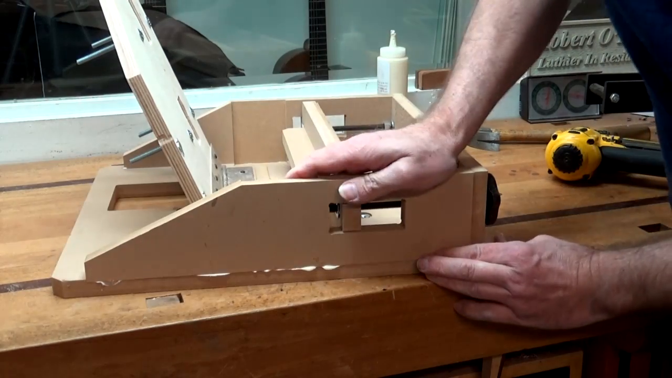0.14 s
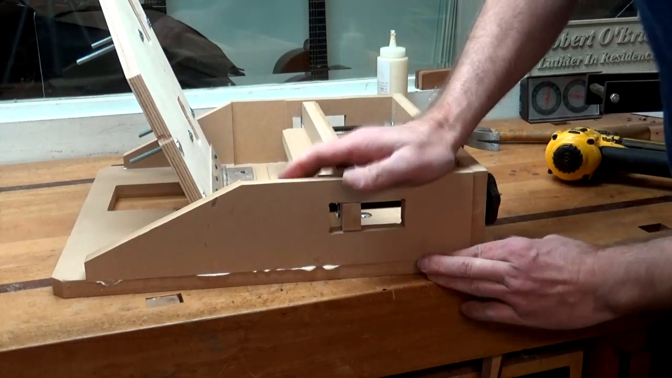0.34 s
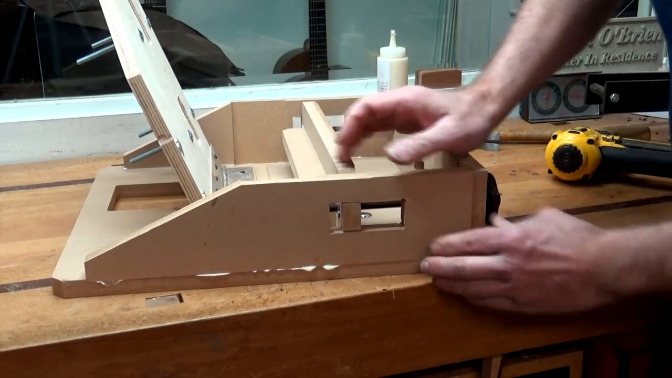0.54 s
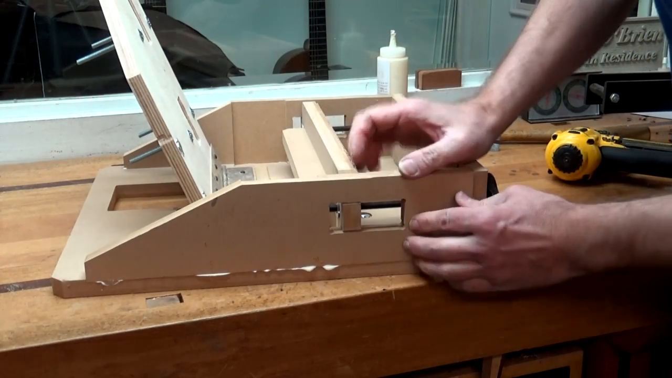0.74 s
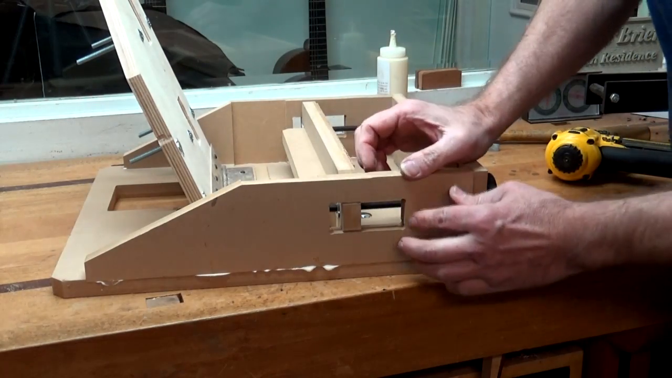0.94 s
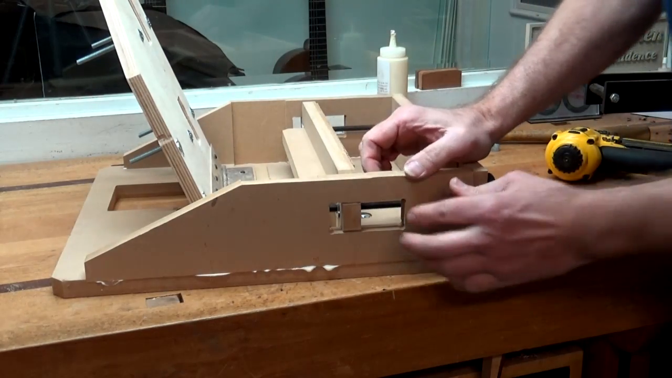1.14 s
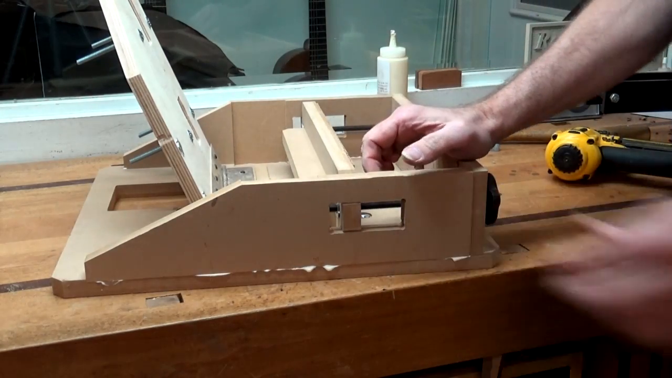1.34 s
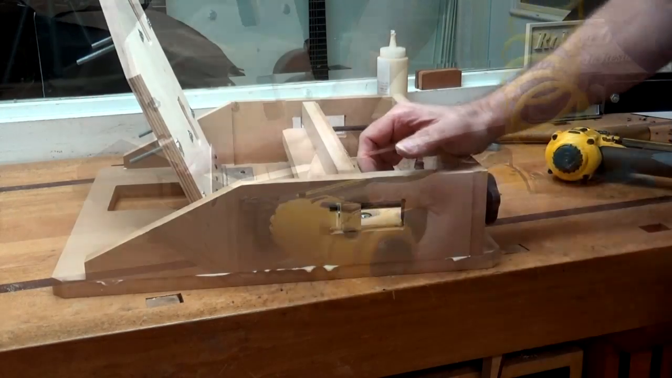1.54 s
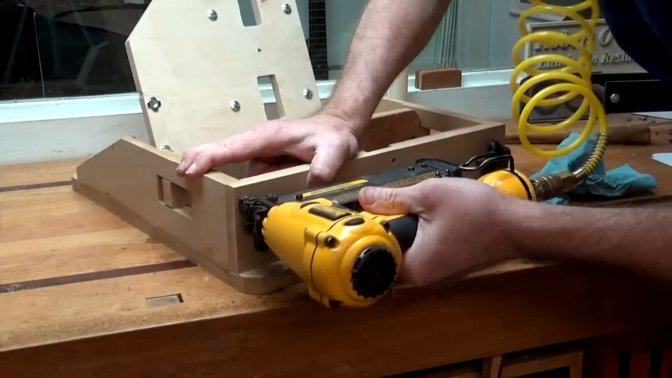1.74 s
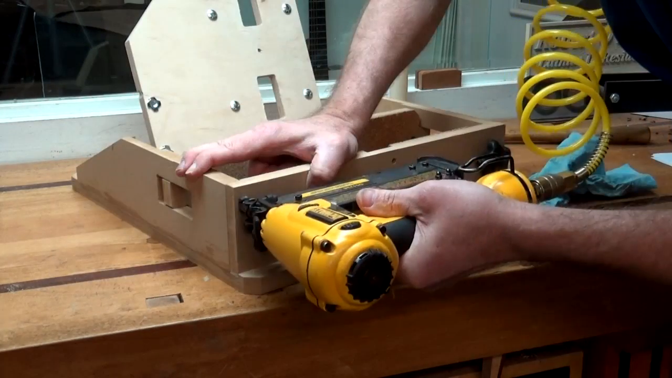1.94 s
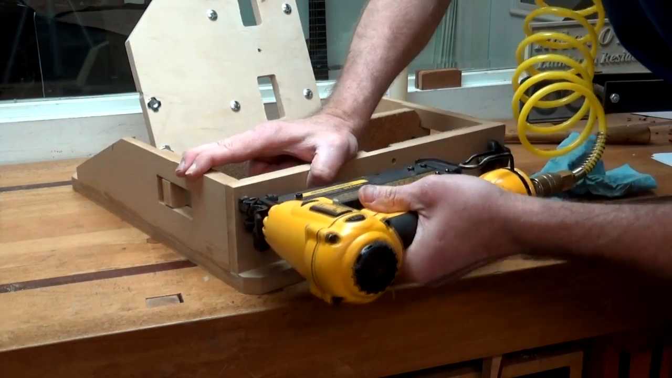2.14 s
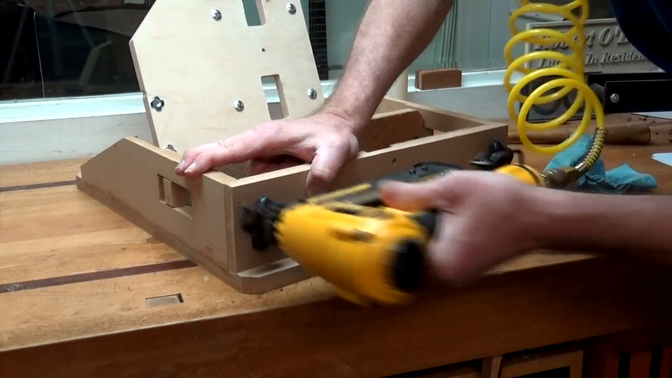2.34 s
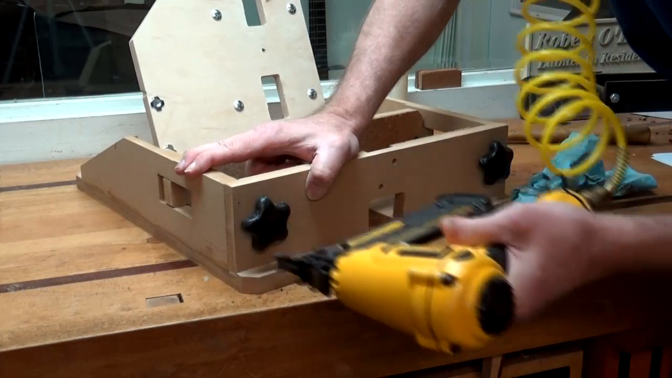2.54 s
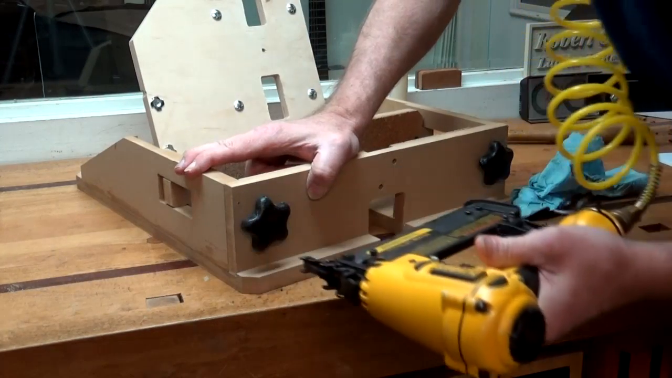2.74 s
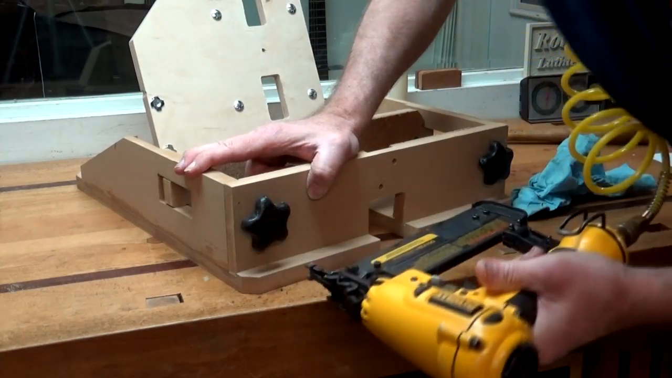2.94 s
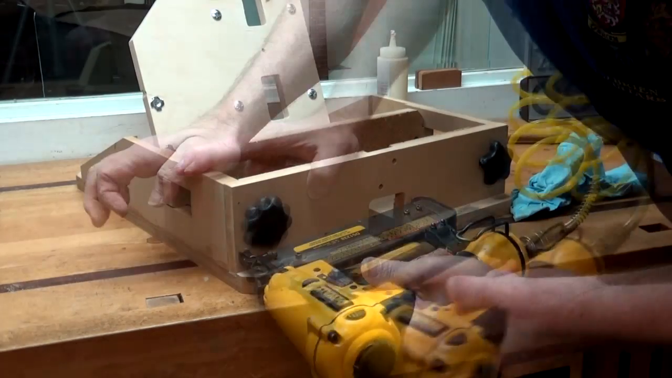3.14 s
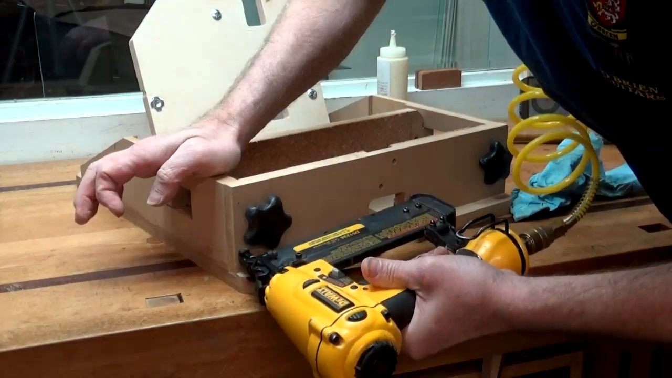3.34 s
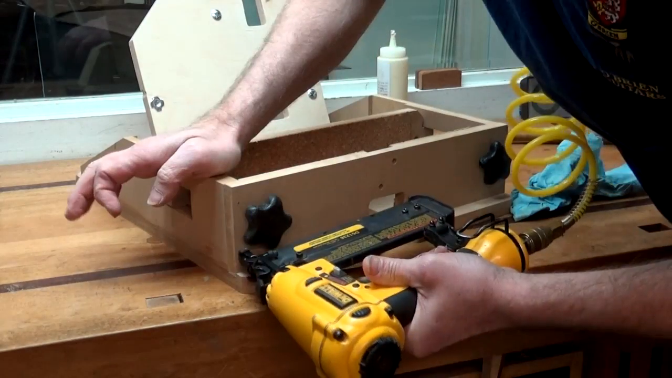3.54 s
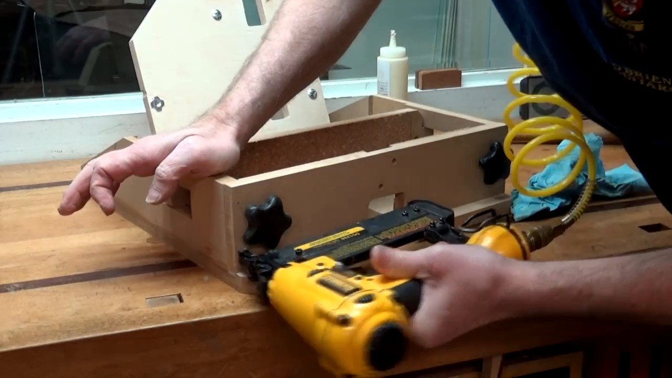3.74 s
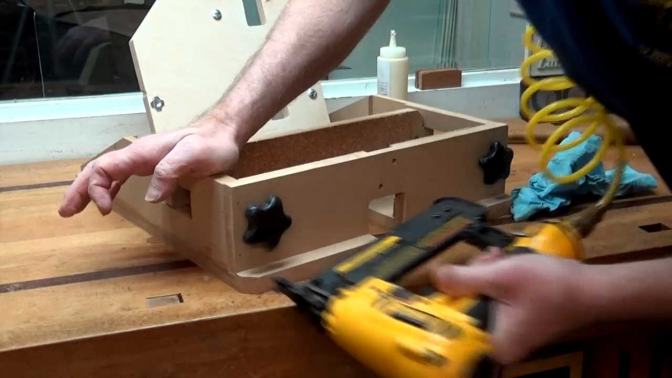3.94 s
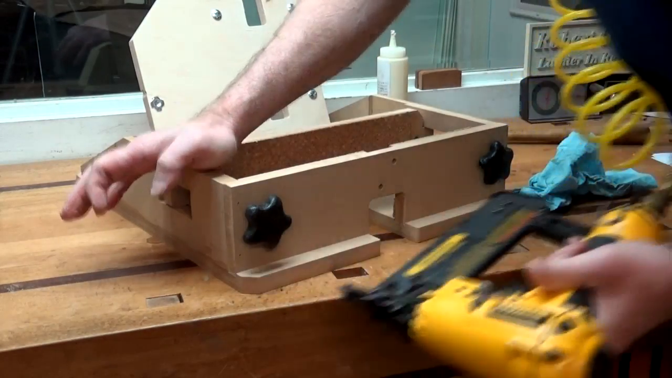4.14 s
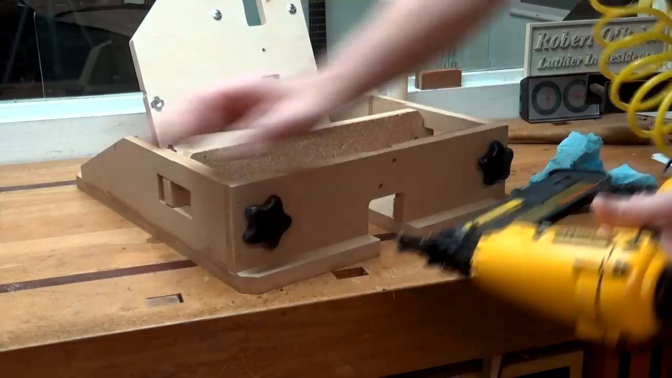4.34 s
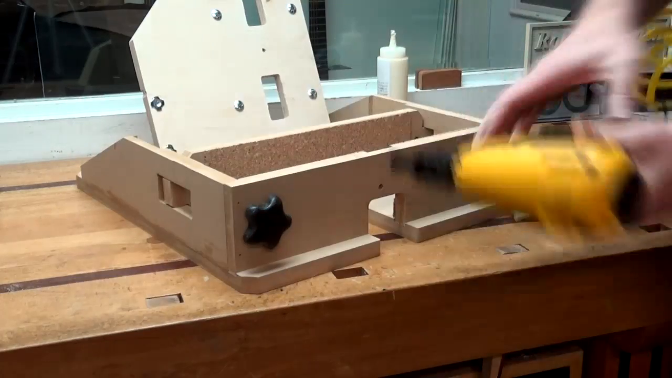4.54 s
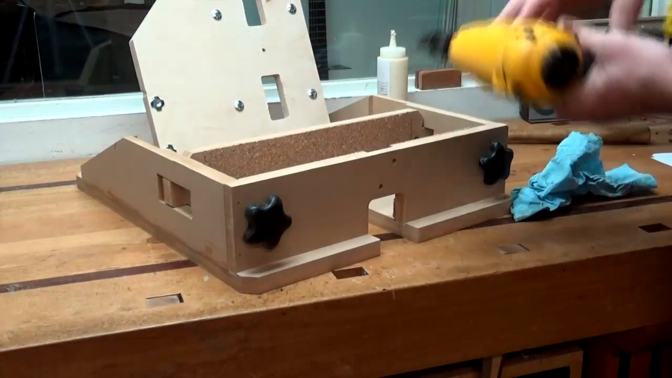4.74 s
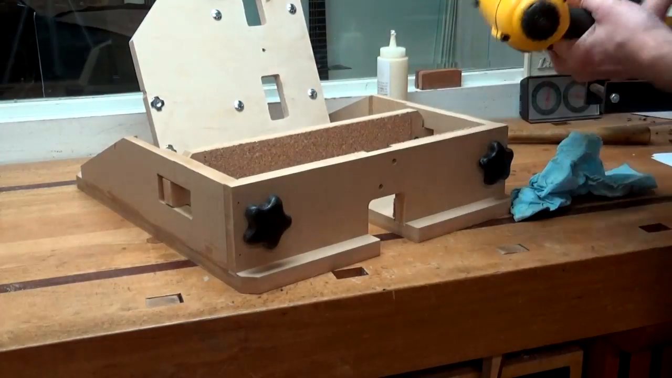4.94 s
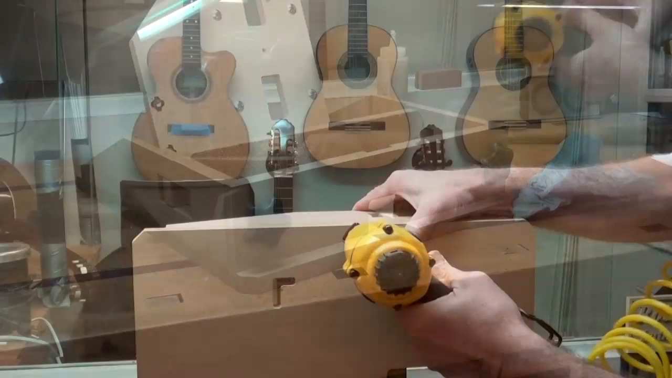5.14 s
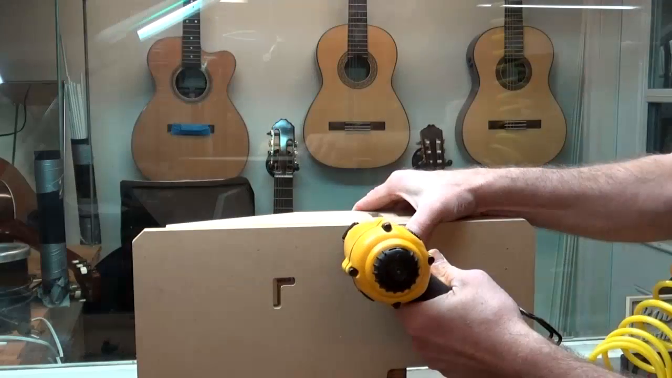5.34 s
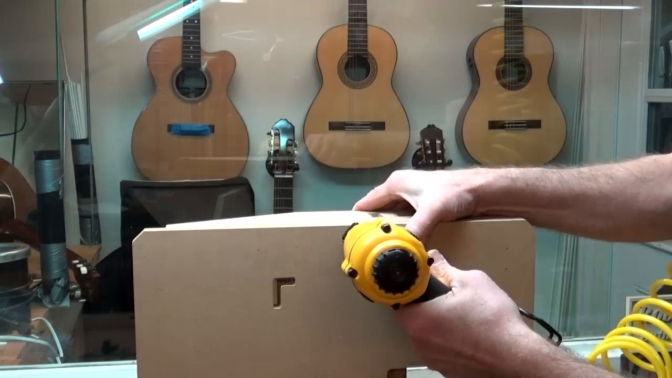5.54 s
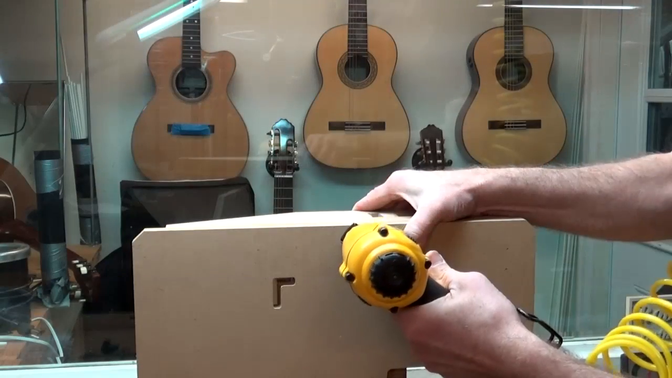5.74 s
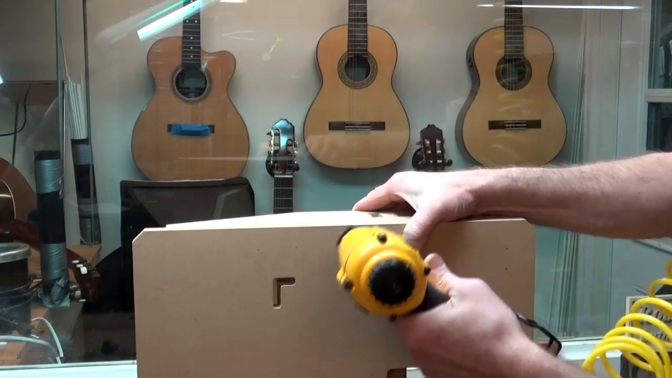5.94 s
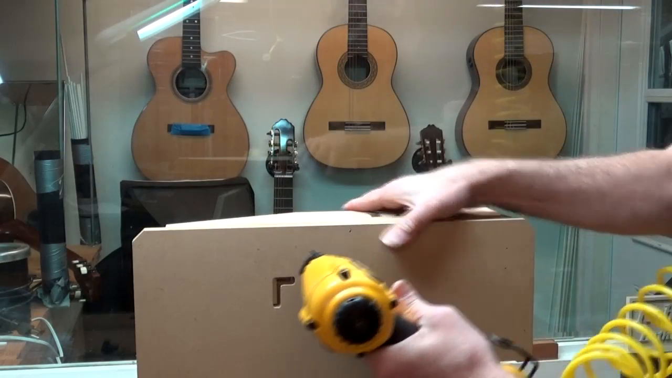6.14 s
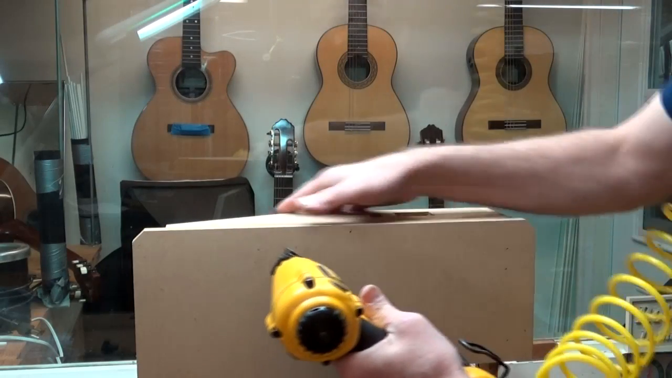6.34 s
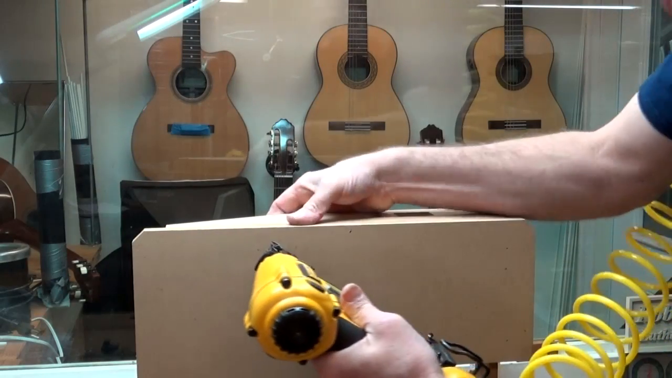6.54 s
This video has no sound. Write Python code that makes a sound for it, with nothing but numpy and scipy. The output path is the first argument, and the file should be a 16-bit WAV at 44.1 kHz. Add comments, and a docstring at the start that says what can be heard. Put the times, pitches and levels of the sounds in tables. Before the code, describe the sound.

In a small live workshop, faint wooden knocks and sliding give way to three fierce pneumatic nail gun shots, each ending in sharp exhaust hiss.

```python
"""Ventilation and a faint fan hum run throughout a small, live workshop; hands knock and slide a wooden jig.
A pneumatic nail gun then drives three nails, with more handling and gun clicks in between.
Each shot: a struck-panel blow, coloured noise rushing through the cylinder, a valve snap, exhaust hiss.
After the third, a last spit of air and a few strokes. Synthetic echoes change with the gun's place.
The mono sum, on both channels, is peak-rounded and band-limited."""
import sys
import numpy as np
from scipy import signal
from scipy.fft import rfft, irfft
from scipy.io import wavfile
from scipy.ndimage import uniform_filter1d

SR = 44100
rng = np.random.default_rng(int(sys.argv[2]) if len(sys.argv) > 2 else 0)


def waveform_to_disk(signal):
    """Save audio, clipped to [-1, 1], as 16-bit WAV at the path in sys.argv[1]."""
    frames = np.transpose(np.atleast_2d(signal))
    scaled = np.clip(frames, -1, 1) * 32767
    samples = np.round(scaled).astype(np.int16)
    wavfile.write(sys.argv[1], SR, samples)


N = 290178
T = np.arange(N) / SR


def undb(db):
    """Decibels to amplitude gain."""
    return 10 ** (np.asarray(db) / 20)


def unit(x):
    """Scale to rms 1."""
    return x / np.sqrt(np.mean(x ** 2))


def along(points, hz):
    """Interpolate (Hz, value) points on a log-frequency axis."""
    f, value = np.transpose(points)
    return np.interp(np.log(hz), np.log(f), value)


def bins(size=2 ** 19):
    """Transform frequencies in Hz, floored at 1 to allow the logarithm."""
    return np.maximum(np.fft.rfftfreq(size, 1 / SR), 1)


def hiss(spectrum, resonance=1, size=2 ** 19):
    """Noise of rms 1, coloured by a spectrum and an optional resonance gain."""
    gain = undb(along(spectrum, bins(size))) * resonance
    noise = irfft(rfft(rng.standard_normal(size)) * gain)
    return unit(noise[:N])


def narrow(hz, width_hz, size):
    """Noise of rms 1 through the same resonance twice."""
    resonance = signal.iirpeak(hz, hz / width_hz, fs=SR)
    once = signal.lfilter(*resonance, rng.standard_normal(size))
    return unit(signal.lfilter(*resonance, once))


def band(x, low_hz, high_hz):
    """Band-pass with a soft lower and a steep upper edge."""
    x = signal.lfilter(*signal.butter(2, min(low_hz, SR / 3), "high", fs=SR), x)
    return signal.lfilter(*signal.butter(4, min(high_hz, SR / 3), fs=SR), x)


def fade(t, t60):
    """Exponential decay by 60 dB in t60."""
    return np.exp(-np.log(1000) * t / t60)


def burst(t, rise_s, decay_s):
    """Quick rise times exponential fall."""
    return (1 - np.exp(-t / rise_s)) * np.exp(-t / decay_s)


def add(track, s, sound):
    """Mix a sound into the track at time s."""
    i = max(int(s * SR), 0)
    track[i:i + len(sound)] += sound[:N - i]


def ring(modes, t):
    """Struck modes decay as sines, with random detuning and polarity per blow; strength near 1."""
    hz, db, t60 = np.transpose(modes)[:, :, None]
    chance = rng.standard_normal((len(modes), 2, 1))
    hz = hz * (1 + .006 * chance[:, 0])
    waves = np.sin(2 * np.pi * hz * t) * np.sign(chance[:, 1])
    return np.sum(undb(db) * waves * fade(t, t60), 0) / np.linalg.norm(undb(db))


def strikes(rows, modes, crack_db, crack_s):
    """A contact is a short noise crack plus body ring; its band sets how light or soft it is."""
    out, t = np.zeros(N), T[:SR // 2]
    for s, db, low_hz, high_hz in rows:
        crack = undb(crack_db) * rng.standard_normal(len(t)) * np.exp(-t / crack_s)
        add(out, s, undb(db) * band(ring(modes, t) + crack, low_hz, high_hz))
    return out


# ventilation spectrum: [f/Hz, relative density/dB]
SHOP = [(25, -43.5), (55, -27), (100, -10), (160, -2), (240, 0), (320, -3), (600, -4.5), (1000, -5.5),
        (2000, -7), (2420, -9), (2600, -25), (4000, -21.5), (9000, -29.5), (15000, -39)]
SHOP_DB = -55.5
# fan hum: [f/Hz, rms level/dB]
HUM = [(242.2, -66), (360.7, -69), (597.5, -69)]


def workshop():
    """Steady ventilation noise plus fan sines."""
    hum = sum(undb(db) * np.sqrt(2) * np.sin(2 * np.pi * (hz * T + rng.random())) for hz, db in HUM)
    return undb(SHOP_DB) * hiss(SHOP) + hum


def rubbing(spectrum, grain_db, grain_hz):
    """Friction noise catches and slips: its level wanders by grain_db rms."""
    catches = uniform_filter1d(rng.standard_normal(N), max(int(SR / grain_hz), 1))
    return unit(hiss(spectrum) * undb(grain_db * unit(catches)))


# rubbed wood; dragged hose and sleeve: [f/Hz, relative density/dB]
WOOD = [(60, -30.5), (200, -3), (450, 1.5), (900, -3.5), (2000, -9.5), (3000, -27), (8000, -39),
        (14000, -43.5)]
HOSE = [(150, -13.5), (500, 5.5), (1200, -2), (2200, 5), (3000, -5), (4200, -5), (6000, -11.5), (9500, -18),
        (13000, -39.5)]
# hand strokes: [t of top speed/s, speed-up to it from 1/e /s, slow-down to 1/e /s,
#                wood level/dB, rustle level/dB]
STROKES = [(.1, 0.23, 0.36, -60.5, -59), (.47, 0.1, 0.1, -55.5, -56.5), (1.38, 0.26, 0.37, -57, -58.5),
           (1.58, 0.074, 0.11, -46, -54.5), (2.98, .2, 0.25, -55.5, -59.5), (4.27, 0.15, 0.4, -54, -64),
           (4.86, 0.39, 0.23, -62, -49.5), (6.249, 0.069, 0.11, -57, -50), (6.43, 0.084, .14, -58, -43),
           (6.57, 0.092, .08, -46, -52.5)]


def strokes():
    """Hands slide the jig and drag hose and sleeve; friction level follows bell-shaped speed."""
    wood, hose = 0, 0
    for s, rise_s, fall_s, wood_db, rustle_db in STROKES:
        speed = np.exp(-((T - s) / np.where(T < s, rise_s, fall_s)) ** 2)
        wood = np.hypot(wood, undb(wood_db) * speed)
        hose = np.hypot(hose, undb(rustle_db) * speed)
    wood_sound = wood * rubbing(WOOD, grain_db=0.5, grain_hz=70)
    return wood_sound + hose * rubbing(HOSE, grain_db=1.2, grain_hz=150)


# fingers and gun catching on a surface: [t/s, level/dB, centre f/Hz, width per filter pass/Hz, decay to 1/e /s]
SCUFFS = [(.058, -53, 1490, 4970, 0.029), (.672, -48, 1080, 2580, 0.07), (4.350, -40.5, 2800, 2600, 0.021),
          (4.85, -34.5, 1970, 2860, 0.017), (5.02, -38, 1820, 1516, 0.0096)]


def scuffs(rise_s=0.0066):
    """Brief catches give broad friction-noise bursts."""
    out, t = np.zeros(N), T[:SR // 4]
    for s, db, hz, width_hz, decay_s in SCUFFS:
        add(out, s, undb(db) * narrow(hz, width_hz, len(t)) * burst(t, rise_s, decay_s))
    return out


# skin on wood and plastic: [t/s, level/dB, pitch f/Hz, width per filter pass/Hz, decay to 1/e /s]
SQUEAKS = [(.679, -54, 3150, 120, .022), (.716, -53, 3110, 90, 0.014), (4.963, -41, 3530, 500, 0.015),
           (5.012, -44.5, 3580, 400, 0.0099)]


def squeaks(rise_s=0.0051, overtone_db=-13):
    """Skin sticks and slips at an unsteady pitch: narrow noise plus a weaker octave."""
    out, t = np.zeros(N), T[:SR // 4]
    for s, db, hz, width_hz, decay_s in SQUEAKS:
        tone = narrow(hz, width_hz, len(t))
        tone = tone + undb(overtone_db) * narrow(2 * hz, 2 * width_hz, len(t))
        add(out, s, undb(db) * tone * burst(t, rise_s, decay_s))
    return out


# jig panel modes, also struck by the driver: [f/Hz, relative level/dB, t60/s]
JIG = [(183, -15.5, 0.088), (276, -12, 0.66), (416, -4.5, 0.12), (534, -1.5, 0.037), (742, 0.5, 0.094),
       (1139, -4, .03), (1400, -4, 0.018), (2150, 4.5, 0.046)]
# hands and parts hitting the jig: [t/s, level/dB, low edge f/Hz, high edge f/Hz]
KNOCKS = [(.063, -37, 497, 2960), (.852, -40, 213, 1300), (.879, -36, 130, 2400), (.90, -31.5, 109, 332),
          (1.096, -43, 302, 900), (1.138, -38.5, 419, 910), (1.289, -37, 300, 676), (1.513, -38, 300, 1190),
          (2.226, -38, 249.5, 1803), (3.645, -35, 253.6, 1466), (4.195, -34.5, 199, 678.4),
          (5.701, -39.5, 243, 1790)]


def knocks():
    """Hands and parts strike the wooden panels."""
    return strikes(KNOCKS, JIG, crack_db=-1, crack_s=0.016)


# gun housing modes: [f/Hz, relative level/dB, t60/s]
GUN = [(474, -20.5, .04), (1090, -9.5, 0.027), (1970, -3, 0.018), (2250, -5, 0.016), (3150, -7, 0.0084),
       (3848, -7, 0.0081), (5620, -10, 0.006), (7340, -21, 0.0068), (10100, -5, .007)]
# valve, trigger and safety tip: [t/s, level/dB, low edge f/Hz, high edge f/Hz]
CLICKS = [(2.386, 1.5, 1004, 4470), (3.689, -2, 495, 3600), (3.823, 2.5, 2570, 5200),
          (4.410, -31.5, 1500, 2770), (4.5764, -9, 2000, 5130), (4.6282, -3.5, 387, 7840),
          (4.639, -22, 400, 2780), (4.968, -30.5, 2520, 8900), (5.209, -40.5, 1500, 9540),
          (5.7535, -3.5, 501, 3470)]


def gun_clicks():
    """Hard contacts of small parts ring the gun's housing."""
    return strikes(CLICKS, GUN, crack_db=-10, crack_s=0.0045)


# driver blow noise: [f/Hz, relative density/dB]
BLOW = [(120, -23.5), (250, 4.5), (600, -0.5), (1400, 4), (2500, -5.5), (5000, -11.5), (10000, -15),
        (15000, -27)]


def driver_blow(out, s, blow_db, blow, part, t, blow_s=0.016, lead_s=0.0036, lead_db=-13, jig_db=-14):
    """The piston thumps off its seat, then the driver lands on the nail and rings the jig."""
    fall = np.exp(-t / blow_s)
    add(out, s - lead_s - .003, undb(blow_db - 29.5) * blow[:len(t)] * fall)
    thump = ring(JIG, t) + undb(-11.5) * blow[:len(t)]
    add(out, s - lead_s, undb(blow_db + lead_db) * band(thump * fall, 350, 9000))
    impact = undb(-8) * blow[part] * fall + undb(jig_db) * ring(JIG, t)
    add(out, s, undb(blow_db) * band(impact, 190, 12000))


def cylinder_rush(t, peak_s, swell_s, held_s, leak=0.32):
    """Level of air through the cylinder: a surge over a steady leak while the trigger is held."""
    held = np.clip((held_s - t) / 0.0049, 0, 1)
    surge = leak + (1 - leak) * np.exp(-((t - peak_s) / swell_s) ** 2)
    return surge * held


def boom(drive, hz, t60, t, width_hz):
    """A jig panel sings with the air at wandering phase and rings on; envelope peak 1."""
    swell = signal.fftconvolve(drive, fade(t, t60))[:len(t)]
    wander = np.cumsum(rng.standard_normal(len(t))) * np.sqrt(2 * np.pi * width_hz / SR)
    return swell / swell.max() * np.sin(2 * np.pi * hz * t + wander)


# panels booming with the exhaust, low then high: [f/Hz, t60/s, unsteadiness/Hz]
PANELS = [(271.7, .1, 6), (402.5, 0.056, 8)]
EXHAUST_S, CRACK_OPEN_S = 0.11, .009  # full-charge time; jet rise constant as the valve cracks open


def exhaust_vent(t, jet, exhaust, vent_db, booms_db, jet_db=2, jet_s=0.041, open_s=0.073, close_s=0.0072):
    """A thin bright jet broadens as the valve opens, then the charge runs out; panels boom along."""
    charge = np.exp(-np.maximum(t - EXHAUST_S, 0) / close_s)
    air = undb(jet_db) * jet * burst(t, CRACK_OPEN_S, jet_s) + exhaust * (1 - np.exp(-t / open_s))
    booms = 0
    for db, (hz, t60, width_hz) in zip(booms_db, PANELS):
        booms = booms + undb(db) * boom(charge, hz, t60, t, width_hz)
    return undb(vent_db) * charge * air + booms


# air-port resonances: [f/Hz, width/Hz, level over the hiss/dB]
PORTS = [(550, 86, -1), (744, 48, -3), (2220, 60, -10.5), (3160, 71, 4.5), (4430, 16, 3), (6260, 98, -4.5),
         (6830, 25, -0.5), (9100, 16, 8.5), (9940, 38, 7)]
# cylinder rush, first jet, open exhaust: [f/Hz, relative density/dB]
RUSH = [(90, -37.5), (170, -21), (270, -6), (550, -0.5), (950, -4), (1500, -2.5), (2200, 2), (2700, -4.5),
        (3800, -1.5), (5200, -7), (7000, -2), (8900, -8.5), (11000, -18.5), (15000, -35.5)]
JET = [(100, -31), (400, -6.5), (1100, -25), (3000, -6.5), (5000, -4), (8400, 1), (10500, -5),
       (12500, -9.5), (15000, -36.5)]
EXHAUST = [(90, -32.5), (170, -11.5), (350, -8.5), (540, -5.5), (1100, -10.5), (1700, -6), (2130, 0.5),
           (2750, -6), (4500, -4.5), (7000, 2), (8600, 0), (10000, -7), (12000, -17.5), (15000, -33)]
# shots: [t of blow/s, blow level/dB, rush level/dB, delay to rush peak/s, swell from 1/e to peak/s,
#         t exhaust opens/s, exhaust level/dB, low panel boom/dB, high panel boom/dB]
SHOTS = [(2.261, -1.5, -9, 0.063, 0.049, 2.391, -4.5, -37, -28),
         (3.680, -4.5, -10.5, .072, 0.05, 3.828, -5.5, -35.5, -27),
         (5.744, -2, -10, 0.081, 0.038, 5.867, -7, -23, -34.5)]
PUFF_S, PUFF_DB = 6.063, -13  # last spit of air as the gun lifts off


def nail_gun(puff_s=0.0073):
    """The driver hits, air surges through the cylinder, and on release the charge vents."""
    f = bins()
    port_power = sum(undb(db) ** 2 / (1 + (2 * (f - hz) / width) ** 2) for hz, width, db in PORTS)
    ports = np.sqrt(1 + port_power)
    blow, rush, jet, exhaust = hiss(BLOW), hiss(RUSH, ports), hiss(JET, ports), hiss(EXHAUST, ports)
    out, t = np.zeros(N), T[:SR]
    for s, blow_db, rush_db, peak_s, swell_s, vent_s, vent_db, *booms_db in SHOTS:
        part = slice(int(s * SR) - len(t), int(s * SR))  # fresh turbulence per shot
        driver_blow(out, s, blow_db, blow, part, t)
        add(out, s, undb(rush_db) * rush[part] * cylinder_rush(t, peak_s, swell_s, vent_s - s))
        add(out, vent_s, exhaust_vent(t, jet[part], exhaust[part], vent_db, booms_db))
    add(out, PUFF_S, undb(PUFF_DB) * exhaust[:len(t)] * burst(t, 0.0021, puff_s))
    return out


# room decay: [f/Hz, t60/s]
ROOM = [(100, 0.13), (300, 0.52), (1000, 0.34), (2200, 0.34), (4500, 0.3), (8000, 0.225), (13000, 0.11)]


def room(x, gap_s=0.0025, build_s=0.0052, early=0.31, early_s=0.0069):
    """Echoes build after a gap, stronger early from bench and walls; each band decays at its own rate."""
    t = T[:SR]
    noise, f = rfft(rng.standard_normal(SR)), bins(size=SR)
    tail = 0
    for k, (hz, t60) in enumerate(ROOM):
        share = along([(row[0], j == k) for j, row in enumerate(ROOM)], f)
        tail = tail + irfft(noise * share, SR) * fade(t, t60)
    build = 1 - np.exp(-np.maximum(t - gap_s, 0) / build_s)
    tail = tail * build * (1 + early * np.exp(-t / early_s))
    return signal.fftconvolve(x, tail / np.linalg.norm(tail))[:N]


# gun at a new place from: [t/s]
MOVES_S = [3.3, 4.3, 5.4]


def scene():
    """Gun and handling, direct and through a room response per gun place, over ventilation."""
    gun = nail_gun()
    clicks = gun_clicks()
    handling = knocks() + scuffs() + squeaks() + strokes()
    radiated = undb(-4.5) * gun + undb(-6.5) * clicks + undb(-9.5) * handling
    place = np.searchsorted(MOVES_S, T)
    echoes = sum(room(radiated * (place == k)) for k in np.unique(place))
    return np.tile(gun + clicks + handling + echoes + workshop(), (2, 1))


TOP_HZ = 15500


def record(dry, rolloff_hz=12500, low_cut_hz=52):
    """Round off loud peaks toward 0.95, cut rumble, dull the treble and stop it steeply at the top."""
    clipped = .95 * dry / (1 + dry ** 8) ** (1 / 8)
    dulled = band(clipped, low_cut_hz, rolloff_hz)
    return signal.sosfilt(signal.ellip(8, .2, 70, TOP_HZ, fs=SR, output="sos"), dulled)


dry = scene()
out = record(dry)
waveform_to_disk(out)
```